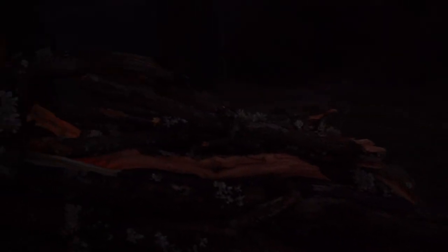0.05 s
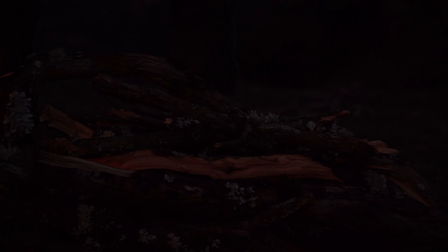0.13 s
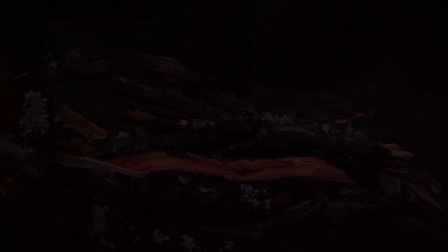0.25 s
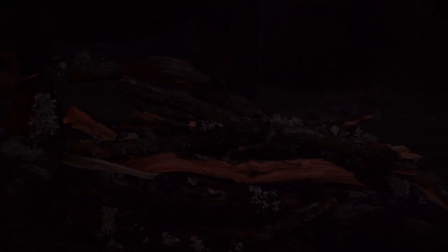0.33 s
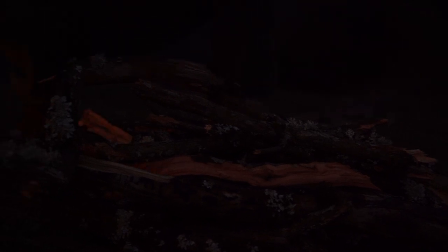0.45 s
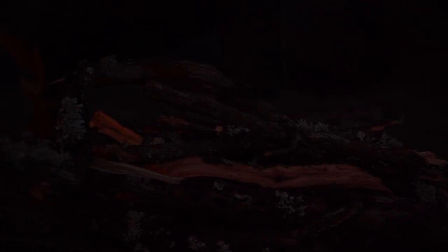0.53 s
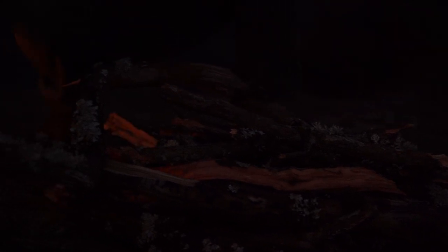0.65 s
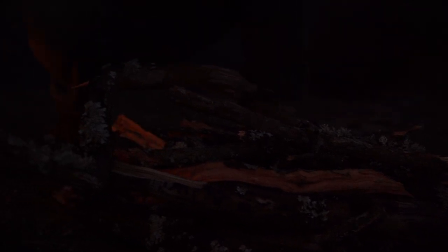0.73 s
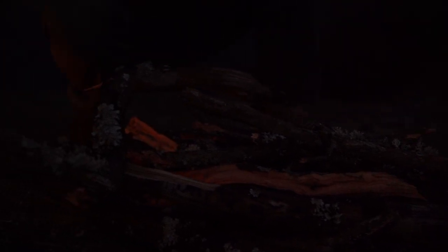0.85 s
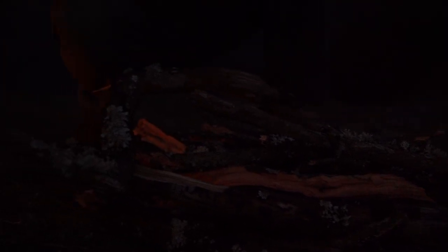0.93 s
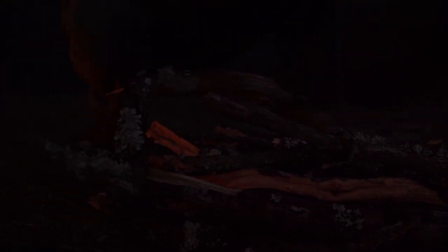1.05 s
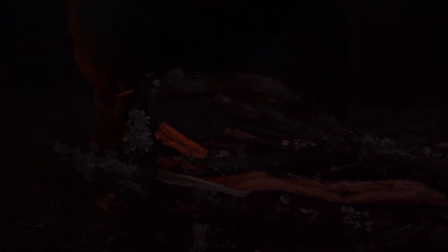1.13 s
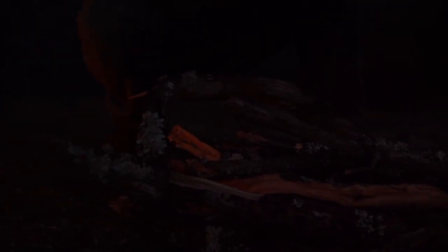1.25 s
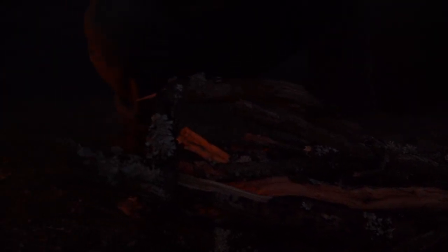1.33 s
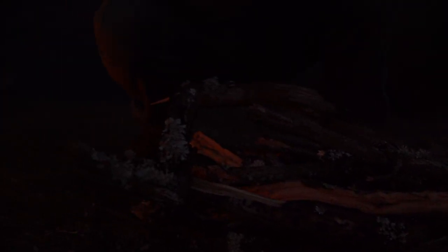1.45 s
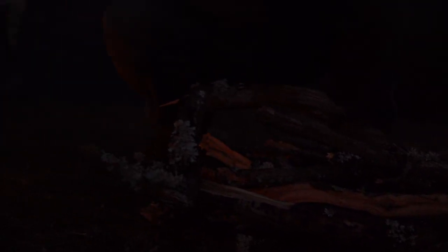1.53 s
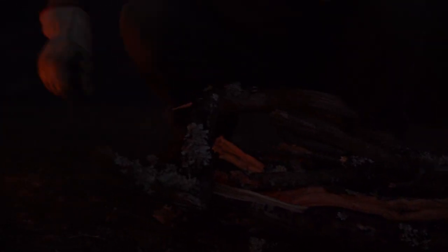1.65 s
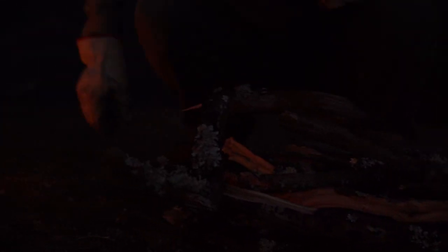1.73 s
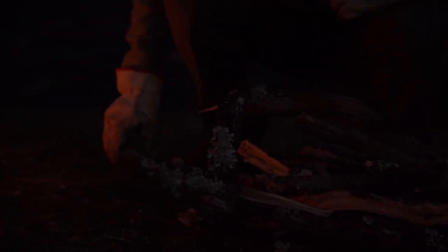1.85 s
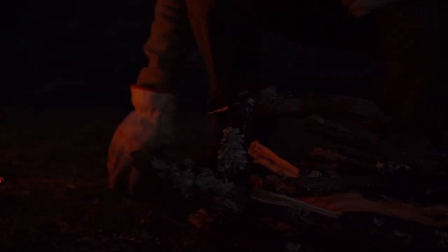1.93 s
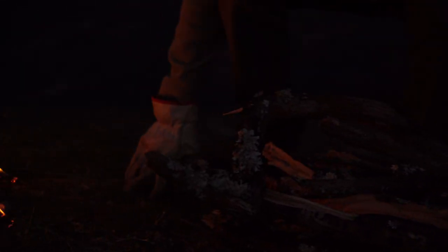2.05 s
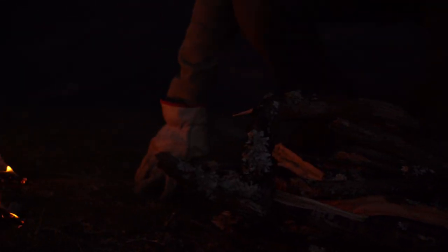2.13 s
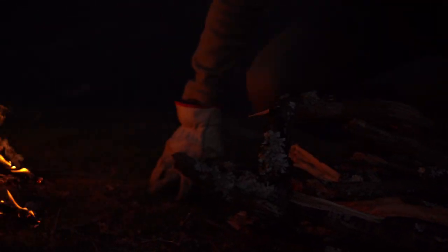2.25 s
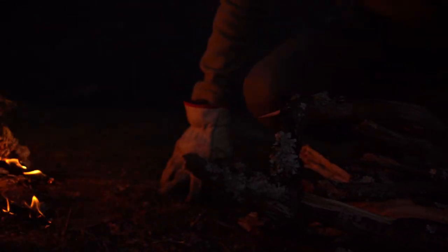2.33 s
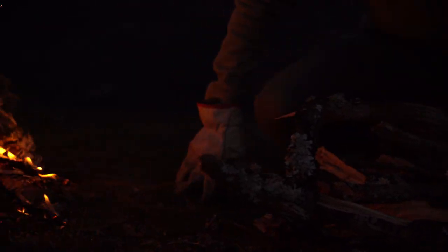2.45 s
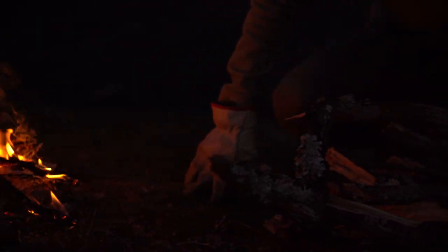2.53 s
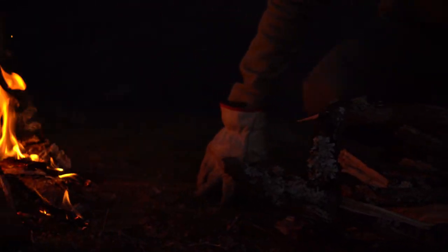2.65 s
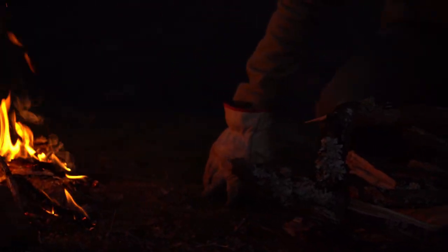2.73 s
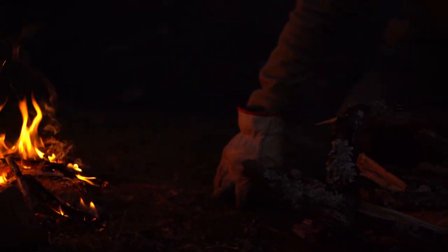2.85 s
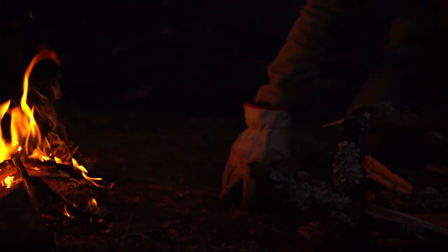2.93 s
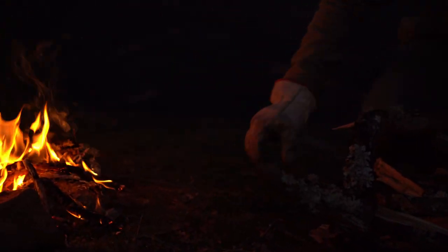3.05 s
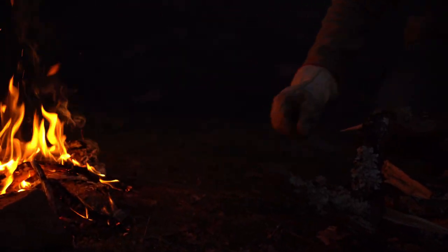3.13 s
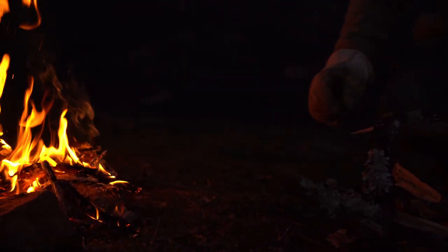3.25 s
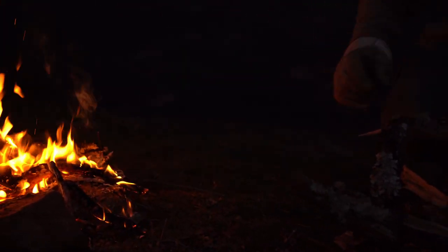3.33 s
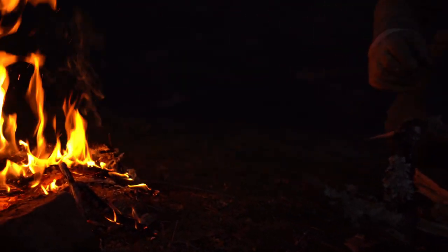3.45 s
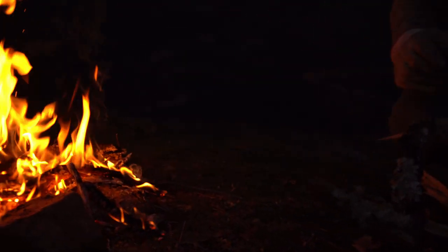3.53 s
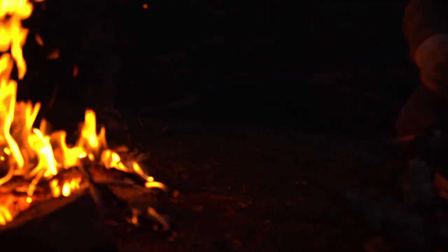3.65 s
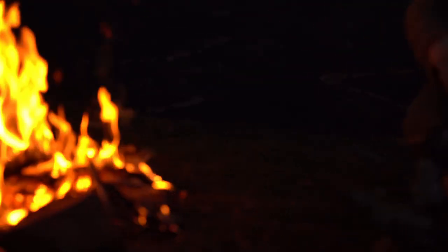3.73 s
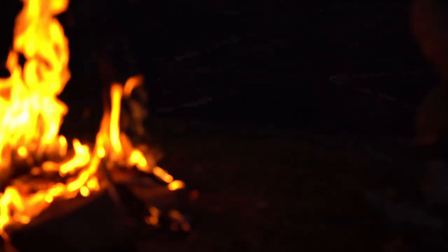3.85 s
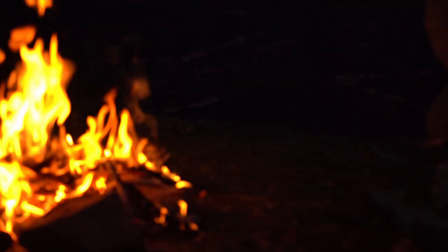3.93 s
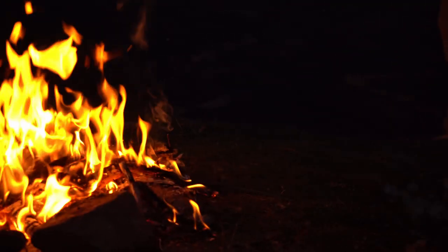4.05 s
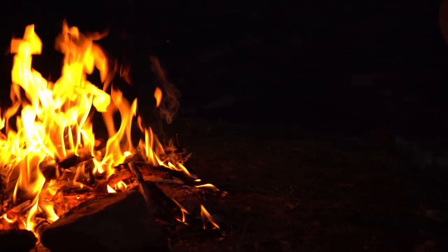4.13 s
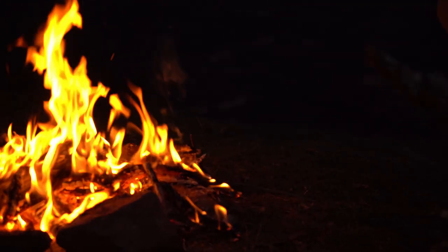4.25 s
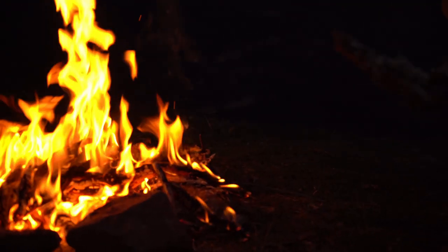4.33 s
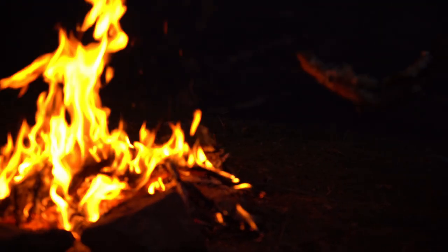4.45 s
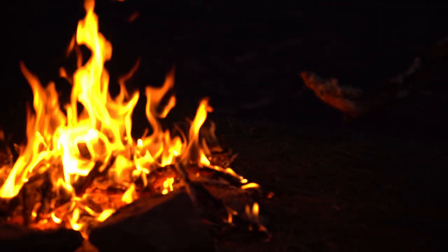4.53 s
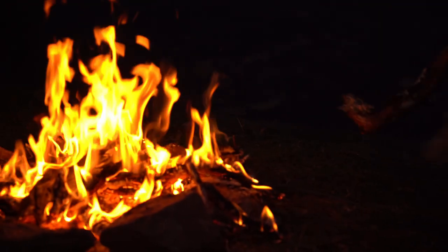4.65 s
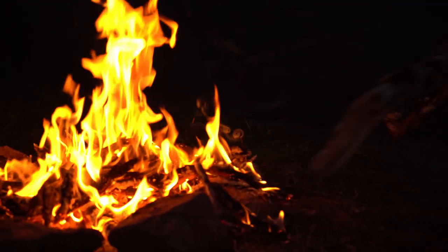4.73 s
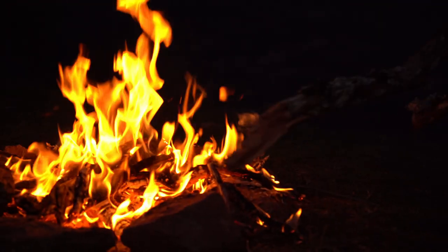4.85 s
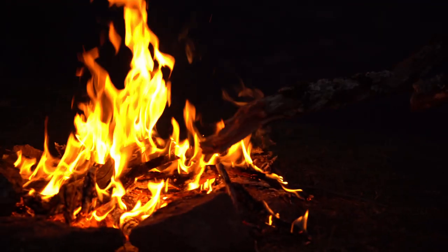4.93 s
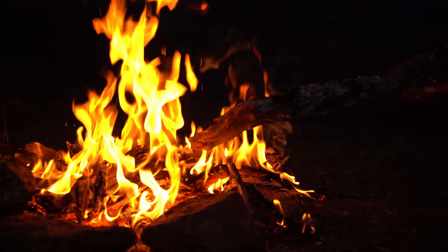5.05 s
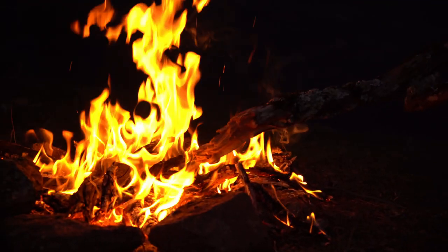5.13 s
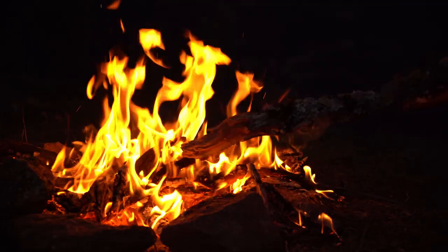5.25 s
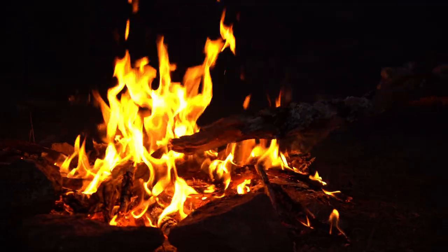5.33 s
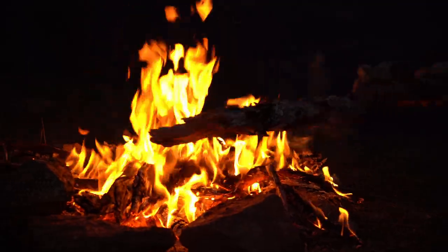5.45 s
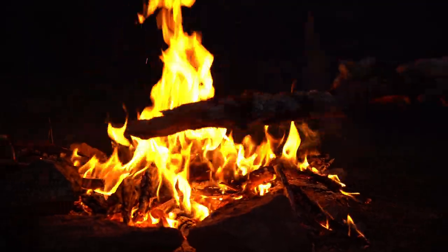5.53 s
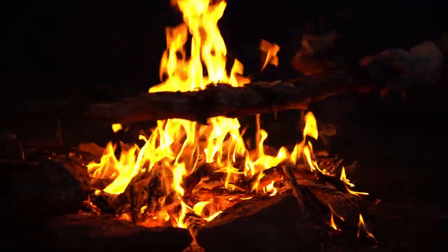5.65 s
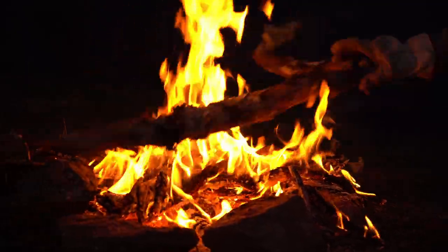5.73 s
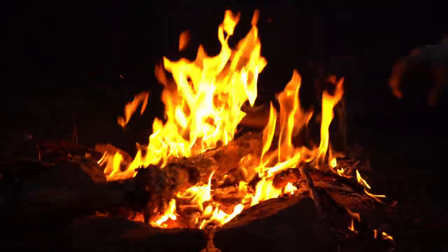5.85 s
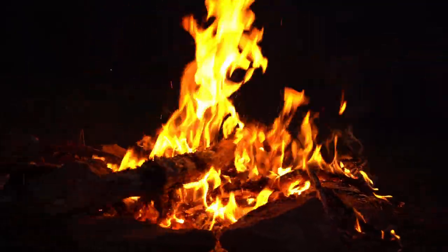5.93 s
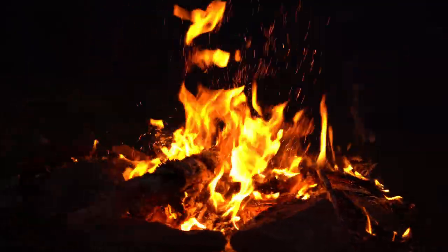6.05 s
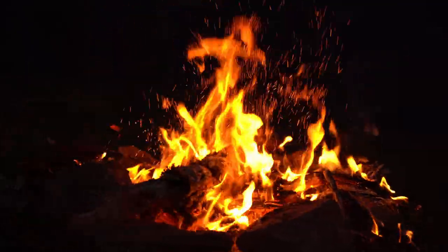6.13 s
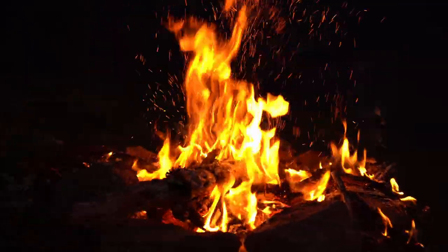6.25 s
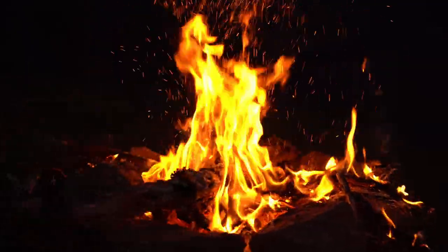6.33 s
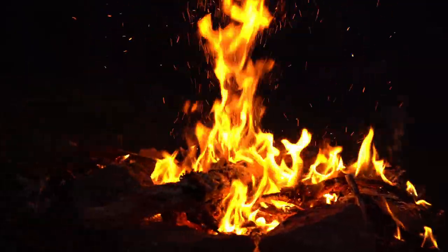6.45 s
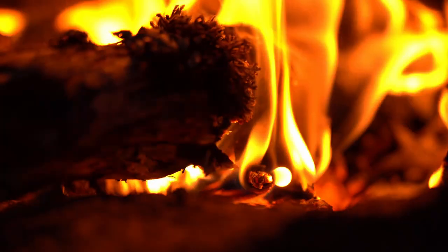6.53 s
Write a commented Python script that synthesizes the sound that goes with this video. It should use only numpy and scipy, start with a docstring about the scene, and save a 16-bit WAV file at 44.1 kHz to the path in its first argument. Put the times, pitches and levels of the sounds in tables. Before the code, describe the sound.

Wood fire snaps and murmurs up close at night; a heavy log lands, knocks and bounces, crushing charcoal, followed by sizzling and tiny squeaks.

```python
"""A campfire at night, the microphone close by, the sound all but mono.
From the start flames murmur as filtered noise, pockets of sap and steam pop as resonating pressure bursts,
and wood shifts, scrapes and crunches as showers of random clicks. A second layer of fire, low fluttering
noise and sizzling clicks, cuts in at 3.65 s and out at 6.53 s. Within it a log drops, knocking and bouncing
as decaying modes, crushes the embers and sends up a hiss of sparks; wet wood squeaks in short rising tones."""
import sys
import numpy as np
from scipy import signal
from scipy.fft import rfft, irfft
from scipy.io import wavfile

SR = 44100
rng = np.random.default_rng(int(sys.argv[2]) if len(sys.argv) > 2 else 0)


def wrap_up_sound(samples):
    """Save the sound to the file named by the first command line argument, as 16-bit audio."""
    columns = np.atleast_2d(samples).T
    # keep every value between -1 and 1, then stretch to whole-number steps
    tamed = np.clip(columns, -1, 1)
    steps = np.round(tamed * 32767).astype(np.int16)
    wavfile.write(sys.argv[1], SR, steps)


N = 290611  # samples
TIME, HZ = np.arange(N) / SR, np.fft.rfftfreq(N, 1 / SR)


def amp(db):
    """Decibels to gain."""
    return 10 ** (np.asarray(db) / 20)


def evened(x):
    """Scales to an rms of 1."""
    return x / np.sqrt(np.mean(x ** 2) + 1e-20)


def unit(x):
    """Scales to an energy of 1."""
    return x / np.sqrt(np.sum(x ** 2) + 1e-20)


def add(mix, start_s, sound):
    """Lays a sound into the mix from a start time, cut off at the end of the mix."""
    part = mix[round(start_s * SR):][:len(sound)]
    part += sound[:len(part)]


def level(rows):
    """Gain at every sample from (time [s], level [dB]) rows."""
    return amp(np.interp(TIME, *np.transpose(rows)))


def coloured(x, points):
    """Filters x by a curve of (frequency [Hz], level [dB]) points, joined along log frequency."""
    hz, db = np.transpose(points)
    curve_db = np.interp(np.log(HZ + 1), np.log(hz + 1), db)
    return irfft(rfft(x) * amp(curve_db), N)


def resonate(x, hz, q):
    """One damped resonance, as a two-pole band-pass."""
    w = 2 * np.pi * hz / SR
    damping = np.sin(w) / (2 * q)
    return signal.lfilter([damping, 0, -damping], [1 + damping, -2 * np.cos(w), 1 - damping], x)


def drift(rate_hz):
    """Slow random motion of rms 1, with nothing faster than rate_hz."""
    return evened(irfft(rfft(rng.standard_normal(N)) * (HZ < rate_hz), N))


def grains(per_s, spread_db):
    """Random clicks of either sign, most small and a few large."""
    size = amp(spread_db * np.minimum(rng.exponential(1, N), 4.5))
    sign = rng.choice([-1., 1.], N)
    return size * sign * (rng.random(N) < per_s / SR)


def swell(start_s, rise_s, t60_s, hold_s=0):
    """Rises in a straight line from the start time, holds, then decays by 60 dB in each t60."""
    age = np.maximum(TIME - start_s, 0)
    rise = np.minimum(age / rise_s, 1)
    return rise * amp(-60 * np.maximum(age - rise_s - hold_s, 0) / t60_s)


def burst(t, scatter_db, t60_s):
    """A sudden release of pressure, its reflection off the nearest wood and its scatter among the sticks."""
    envelope = amp(-60 * t / t60_s) * (1 - np.exp(-t / 0.00021))
    kick = amp(scatter_db) * unit(rng.standard_normal(len(t)) * envelope)
    kick[0] -= 1  # the release itself
    reflection_s = rng.uniform(.00015, .0005)
    kick[round(reflection_s * SR)] += .4
    return kick


def ticks(low_hz, high_hz, count):
    """Tiny cracks in bunches; each fibre splinters and rings briefly at its own pitch, most of them faintly."""
    t, fibres = np.arange(256) / SR, np.zeros(N)
    for when, pitch, size in rng.random((count, 3)):
        size_db = min(-3.8 * np.log(1 - size), 17)
        hz = low_hz * (high_hz / low_hz) ** pitch
        crack = resonate(burst(t, scatter_db=0, t60_s=.005), hz, q=2.6)
        add(fibres, when * N / SR, amp(size_db) * unit(crack))
    bunching = amp(2.5 * drift(rate_hz=12))
    return evened(fibres * bunching)


# faint pops: middle energies [dB], snap pitch [Hz] and Q, and how far they stray to either side
FAINT_SNAP_DB, FAINT_KNOCK_DB, FAINT_HZ, FAINT_Q = -30.5, -34, 5860, 1.6
FAINT_RANGE_DB, FAINT_RANGE_OCTAVES = 3.5, 0.68


def faint_pops(count):
    """Small pockets burst at random moments, each with its own strength and pitch."""
    rows = []
    for when, snap, pitch, knock in rng.uniform(-1, 1, (count, 4)):
        time_s = (when + 1) / 2 * N / SR
        hz = FAINT_HZ * 2 ** (FAINT_RANGE_OCTAVES * pitch)
        snap_db = FAINT_SNAP_DB + FAINT_RANGE_DB * snap
        knock_db = FAINT_KNOCK_DB + FAINT_RANGE_DB * knock
        rows.append((time_s, snap_db, hz, FAINT_Q, knock_db))
    return rows


# loud pops in the wood, each a snap over a hollow knock:
# (time [s], snap energy [dB], snap pitch [Hz], snap Q, knock energy [dB])
LOUD_POPS = [(0.0689, -17, 4940, 0.4, -23), (0.1752, -10, 7200, 3.3, -11.5), (0.195, -24, 9000, 1.5, -30.5),
             (0.236, -11.5, 3300, .9, -34), (0.2669, -15, 12700, 1.1, -24), (0.2763, 2, 4050, 0.86, -2.5),
             (0.296, -8, 2600, 0.81, -11), (0.399, -26, 7550, 4, -27), (0.4298, -20, 4960, 4, -26),
             (0.5574, -24, 3130, 1.1, -25), (0.6935, -18.5, 3370, 4.2, -15), (0.826, -8, 3700, 1.8, -41),
             (0.8282, -5, 7160, 3.2, 2), (0.9156, -10.5, 4500, 2.6, -18.5), (0.9199, -16.5, 6300, .9, -20),
             (1.0945, -2.5, 4200, 1.1, -9.5), (1.1155, -4, 4100, 3.1, -6.5), (1.1631, -14, 4200, 4, -12.5),
             (1.1772, -5, 4960, 1.4, -14), (1.4012, -11, 3740, 2.1, -10.5), (1.6008, -22, 12600, 0.5, -51),
             (1.6735, -5.5, 2600, 0.52, -6.5), (1.6785, -4.5, 4830, 2, -7),
             (1.842, -13.5, 4500, 0.93, -16.5), (1.8593, -8.5, 6800, 1.1, -13.5),
             (1.9165, -17, 12700, 0.39, -15), (2.1127, -17, 4400, 1.2, -13.5),
             (2.3567, -17, 4160, 1.3, -19.5), (2.5095, -21, 7750, 0.35, -25),
             (2.5356, -15.5, 5500, .9, -17), (2.6604, -15, 7300, 4.3, -41), (2.6812, -7, 2160, 1.9, -14),
             (2.703, 2, 2120, .52, -16), (2.7294, -21, 1900, 5, -16), (2.8567, -15, 4100, .8, -22.5),
             (2.9528, 3.5, 4970, 0.57, -8), (2.9679, -16, 7400, 2.4, -38), (2.9857, -14, 3280, 1.9, -39),
             (3.274, -15, 4100, .6, -14.5), (3.298, -9, 4000, 2.9, -10.5),
             (3.3314, -9.5, 5470, 0.89, -14.5), (3.4427, -20, 5830, 0.23, -32),
             (3.5946, -17.5, 3400, 0.95, -22), (3.8458, -15.5, 3800, 0.27, -43),
             (3.964, -44, 1500, 1.4, -14), (4.0765, -16, 7450, .65, -43), (4.193, -18, 1500, 0.24, -32),
             (4.2439, -14.5, 5900, 1.1, -44), (4.2499, -16, 9800, 1, -48), (4.3864, -17, 7300, 1.1, -50),
             (4.6511, -19.5, 4700, 1.6, -21), (4.7495, 7, 3350, 0.97, -8), (4.931, -12.5, 5530, 1.6, -50.5),
             (5.8094, 7.5, 8500, 0.56, -9.5), (5.8826, -2, 4400, 0.26, -21),
             (5.9082, -0.5, 5550, 1.3, -6.5), (6.0709, -10, 5350, 2.9, -27), (6.12, -12, 4900, 2.1, -33),
             (6.142, -5.5, 7950, 7, -19), (6.1897, -8, 5900, 2.6, -16)]


def pops():
    """Each burst snaps the split in the wood and knocks the hollow under it; the pile adds a dull thump."""
    out, t = np.zeros(N), np.arange(4096) / SR
    for time_s, snap_db, hz, q, knock_db in LOUD_POPS + faint_pops(count=40):
        snap = unit(resonate(burst(t, scatter_db=-11, t60_s=0.0083), hz, q))
        # a softened push reaches the hollow
        push = resonate(burst(t, scatter_db=-8.5, t60_s=0.0071), hz=1050, q=0.2)
        knock = unit(resonate(push, hz=776, q=0.6))
        thump = unit(resonate(burst(t, scatter_db=4.5, t60_s=0.015), hz=343, q=0.89))
        add(out, time_s, amp(snap_db) * snap + amp(knock_db) * (knock + amp(-3.0) * thump))
    return out


# modes of the log: (frequency [Hz], level before the tilt of each blow [dB], t60 [s])
LOG_MODES = [(164.3, -34.5, 0.46), (351.1, -5.5, 0.24), (428, -11, 0.32), (502, -3, 0.035),
             (696, -20, 0.13), (997, -14, 0.089), (1050, -1.5, 0.083), (1232, -8.5, 0.085),
             (1273, -30, 0.074), (1634, -10, 0.076), (2040, -36, 0.069), (2076, -13, 0.037),
             (2204, -21, 0.042), (2350, -12, 0.014), (2880, -27, 0.035)]
# the log lands and bounces:
# (time [s], ring level [dB], ring tilt [dB per octave], clack energy [dB], clack pitch [Hz])
LOG_BLOWS = [(5.8853, -10, -18.5, 9, 340), (5.94, -7.5, -2.5, 11, 1200), (5.9979, -32.5, 8.5, -1, 1040),
             (6.002, -25, -0.5, -11, 2400), (6.009, -51, -1, -4, 1160), (6.039, -45.5, 10.5, -23, 2200),
             (6.067, -22, -15.5, -7, 780)]


def log_drop():
    """Each blow clacks and rings the same modes, which waver as the log rocks; each tilts them its own way."""
    out, t = np.zeros(N), np.arange(SR // 2) / SR
    tilt_pivot_hz = LOG_MODES[1][0]
    for time_s, ring_db, tilt_db, clack_db, clack_hz in LOG_BLOWS:
        rocking = t + 0.011 * np.cumsum(drift(rate_hz=47)[:len(t)]) / SR  # time runs slightly unevenly
        ring = np.zeros(len(t))
        for hz, db, t60_s in LOG_MODES:
            mode_db = db + tilt_db * np.log2(hz / tilt_pivot_hz)
            ring += amp(mode_db - 60 * t / t60_s) * np.sin(2 * np.pi * hz * rocking)
        clack = resonate(burst(t, scatter_db=15, t60_s=0.027), clack_hz, q=0.96)
        clack = unit(resonate(clack, clack_hz, q=0.96))
        add(out, time_s, -amp(ring_db) * ring + amp(clack_db) * clack)
    return signal.sosfilt(signal.butter(3, 140, "high", fs=SR, output="sos"), out)


# colour of breaking charcoal: (frequency [Hz], relative level [dB])
CHARCOAL_COLOUR = [(100, -10), (1000, 0), (5000, 0), (6800, -2.5), (8500, 4), (10800, -4), (13500, 1),
                   (16000, -4)]
CRUNCH_HZ = 4000  # middle pitch of breaking charcoal
# wood shifts, scraping bark and crushing charcoal, for embers() and sticks():
# (time [s], rise [s], t60 [s], scrape level [dB], scrape pitch [Hz], crunch level [dB])
WOOD_SHIFTS = [(0.28, .004, 0.26, -57, 900, -51.5), (0.422, .003, .066, -41, 490, -54),
               (1.402, 0.0015, 0.023, -28, 875, -52), (2.115, 0.0026, 0.015, -31.5, 816, -58),
               (2.394, 0.0052, 0.053, -33, 890, -44), (2.538, .002, 0.034, -33, 910, -63),
               (3.49, 0.026, .067, -40.5, 520, -61), (3.645, 0.023, 0.085, -50, 1500, -39.5),
               (3.965, 0.0053, 0.2, -29.5, 1210, -31), (4.077, 0.018, 0.54, -49, 1210, -42.5),
               (4.644, 0.12, 0.62, -46.5, 1190, -48.5), (4.85, 0.047, 0.29, -49, 1220, -47),
               (5.658, 0.078, 0.16, -42.5, 1470, -40), (5.883, 0.0026, 0.15, -24.5, 1210, -17.5),
               (6.007, .004, 0.14, -45, 1700, -27.5), (6.124, 0.012, 0.43, -49, 1060, -43)]


def embers():
    """Charcoal gives way in uneven showers of tiny fractures."""
    unevenness = amp(3.3 * drift(rate_hz=130))
    grit = coloured(grains(per_s=3800, spread_db=3.4), CHARCOAL_COLOUR) * unevenness
    pressure = np.zeros(N)
    for time_s, rise_s, t60_s, _, _, crunch_db in WOOD_SHIFTS:
        pressure += amp(crunch_db) * swell(time_s, rise_s, t60_s)
    return pressure * evened(resonate(grit, CRUNCH_HZ, q=0.77))


def sticks():
    """Rough bark catches and slips, and each slip sounds the hollow body of a stick."""
    slips = grains(per_s=1100, spread_db=3) * amp(2 * drift(rate_hz=70))
    out = np.zeros(N)
    for time_s, rise_s, t60_s, scrape_db, hz, _ in WOOD_SHIFTS:
        body = evened(resonate(resonate(slips, hz, q=1.36), hz, q=1.36))
        out += amp(scrape_db) * swell(time_s, rise_s, t60_s) * body
    return out


# steam squeaks out of wet wood: (time [s], level [dB], middle pitch [Hz])
STEAM_SQUEAKS = [(6.209, -42, 6640), (6.3, -35.5, 6270), (6.387, -37, 6500), (6.453, -37, 6470)]


def squeaks():
    """Short whistles that rise as the steam forces its way out."""
    out, u = np.zeros(N), np.linspace(0, 1, round(0.0125 * SR))
    for time_s, db, hz in STEAM_SQUEAKS:
        pitch = hz * (1 + 0.4 * (u - .5) - 0.23 * (u - .5) ** 2)
        whistle = np.sin(2 * np.pi * np.cumsum(pitch) / SR)
        add(out, time_s, amp(db) * np.sin(np.pi * u) ** 2 * whistle)
    return out


# colour of the low flutter: (frequency [Hz], relative level [dB])
FLUTTER_COLOUR = [(12, -18), (28, -4), (43, 2), (62, -15), (150, -17), (300, -30), (420, -22), (520, -14),
                  (720, -38), (1200, -30), (3000, -60)]
# colour of the sizzle: (frequency [Hz], relative level [dB])
SIZZLE_COLOUR = [(300, -6), (1300, 1), (2500, -.5), (5200, .5), (6800, -2), (8600, 3), (10800, -8.5),
                 (13500, -5), (16000, -9)]
LAYER_FROM_S, LAYER_TO_S = 3.648, 6.528  # the second layer of fire cuts in and out
# low flutter: level, time constant of its onset, strength and top rate of its random gusts
FLUTTER_DB, FLUTTER_RISE_S, GUST_DB, GUST_HZ = -47, 0.07, 1.4, 5
# the sizzle sinks slowly from its first level
SIZZLE_START_DB, SIZZLE_SAG_DB_PER_S = -58, 0.5
# the landing log sends up sparks: level, then rise, hold and decay
SPARKS_DB, SPARKS_RISE_S, SPARKS_HOLD_S, SPARKS_T60_S = -48, 0.053, 0.38, 0.28


def second_fire_layer():
    """Low noise flutters in gusts; clicks sizzle and spit, hardest once the log has landed."""
    # switched within about 6 ms at either end
    switch = np.clip(np.minimum(TIME - LAYER_FROM_S, LAYER_TO_S - TIME) / 0.0063, 0, 1)
    age = np.maximum(TIME - LAYER_FROM_S, 0)
    gusts = amp(FLUTTER_DB + GUST_DB * drift(GUST_HZ)) * (1 - np.exp(-age / FLUTTER_RISE_S))
    flutter = evened(coloured(rng.standard_normal(N), FLUTTER_COLOUR))
    landing_s = LOG_BLOWS[0][0]
    sparks = amp(SPARKS_DB) * swell(landing_s, SPARKS_RISE_S, SPARKS_T60_S, SPARKS_HOLD_S)
    strength = amp(SIZZLE_START_DB - SIZZLE_SAG_DB_PER_S * age) + sparks
    sizzle = evened(coloured(grains(per_s=9000, spread_db=2.5), SIZZLE_COLOUR))
    sizzle = sizzle * amp(.8 * drift(rate_hz=40))
    spit = ticks(low_hz=5500, high_hz=13000, count=700)
    return switch * (gusts * flutter + strength * (sizzle + amp(-3.5) * spit))


# colour of the murmuring gas: (frequency [Hz], relative level [dB])
MURMUR_COLOUR = [(15, 2), (35, -5), (70, -2), (110, 1), (170, 1), (300, -.5), (500, -8), (800, -16),
                 (2000, -29), (3500, -34), (6800, -38.5), (8400, -34.5), (10500, -42.5), (13000, -38.5),
                 (16000, -41)]
# strength of the murmur and its ticks: (time [s], level [dB])
MURMUR_LEVEL = [(0, -46), (4.4, -47.5), (5.1, -51.5), (5.8, -50.5), (6.59, -44.5)]


def flames():
    """The fluttering murmur of burning gas, with faint ticks from twigs and duller ones deep in the pile."""
    flutter = amp(1.6 * drift(rate_hz=25) + .6 * drift(rate_hz=3))
    gas = evened(coloured(rng.standard_normal(N), MURMUR_COLOUR)) * flutter
    twigs = ticks(low_hz=3000, high_hz=14000, count=600)
    deep = ticks(low_hz=400, high_hz=2000, count=800)
    return level(MURMUR_LEVEL) * (amp(0.88) * gas + amp(-20.0) * twigs + amp(-14.5) * deep)


def clearing(x, wet_db, t60_s):
    """A faint, short echo from the ground and the trees, as decaying noise that starts after 4 ms."""
    t = np.arange(SR // 2) / SR
    tail = resonate(rng.standard_normal(len(t)), hz=2500, q=.25) * amp(-60 * t / t60_s) * (t > .004)
    return amp(wet_db) * signal.fftconvolve(x, unit(tail))[:N]


def scene():
    """Everything sits in the middle, with a trace of width in the treble."""
    cracks = pops() + log_drop() + embers() + sticks()
    echo = clearing(cracks, wet_db=-32.5, t60_s=0.048)
    fire = cracks + echo + squeaks() + second_fire_layer() + flames()
    side = amp(-28) * resonate(np.roll(fire, 9), hz=14000, q=.8)  # 9 samples late
    return np.array([fire + side, fire - side])


EDGE_HZ = 16300  # upper band limit of the recorder


def record(dry):
    """The sharpest pops are rounded off by overload; then the band limit of the recorder."""
    rounded = 1.1 * np.tanh(dry / 1.1)
    low_pass = signal.firwin(255, EDGE_HZ, window=("kaiser", 9), fs=SR)
    return signal.oaconvolve(rounded, low_pass[None], "same")


dry = scene()
out = record(dry)
wrap_up_sound(out)
```